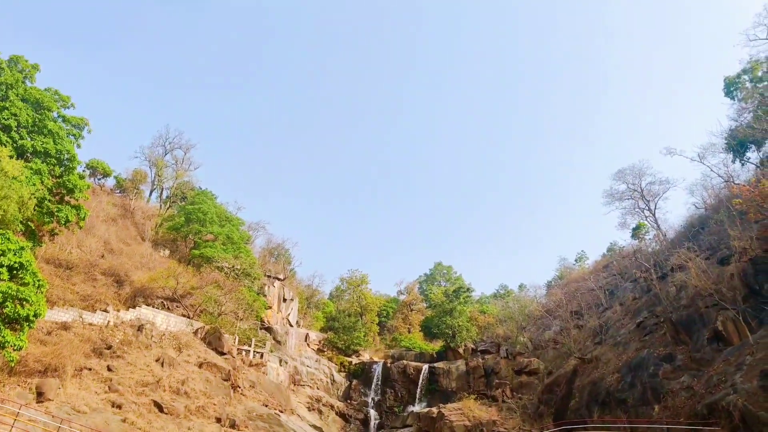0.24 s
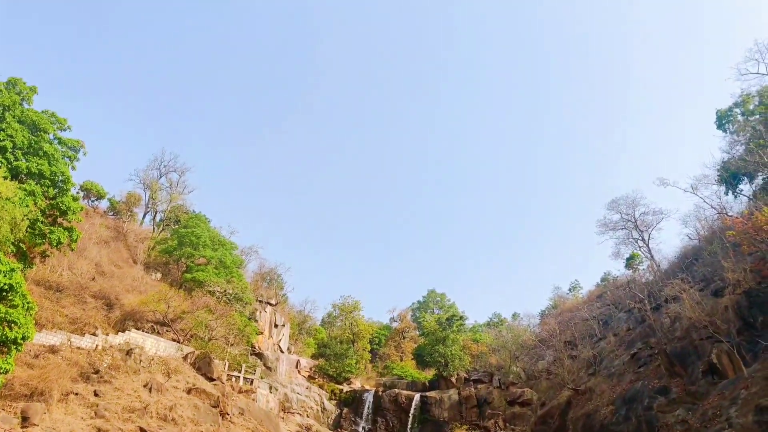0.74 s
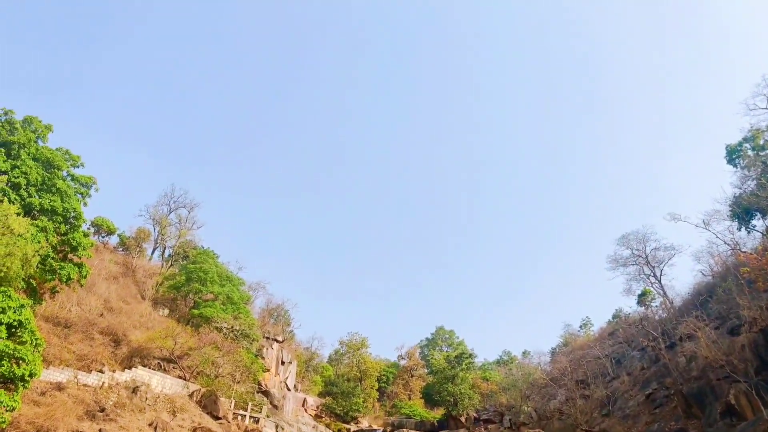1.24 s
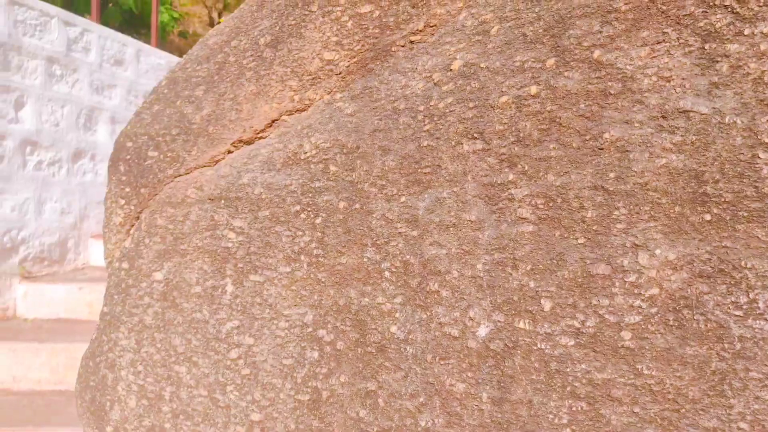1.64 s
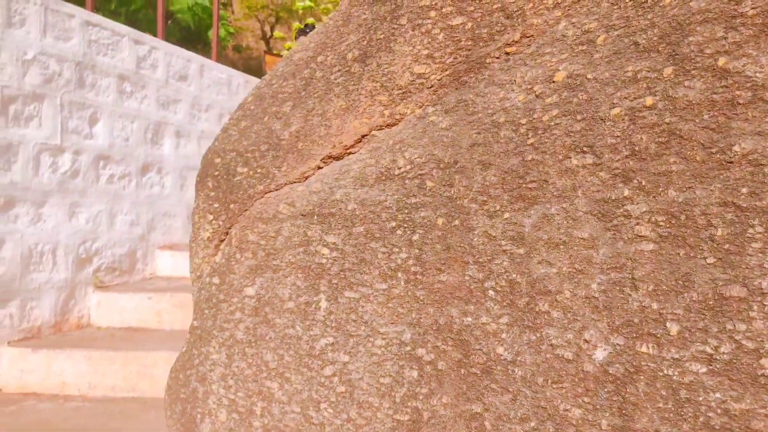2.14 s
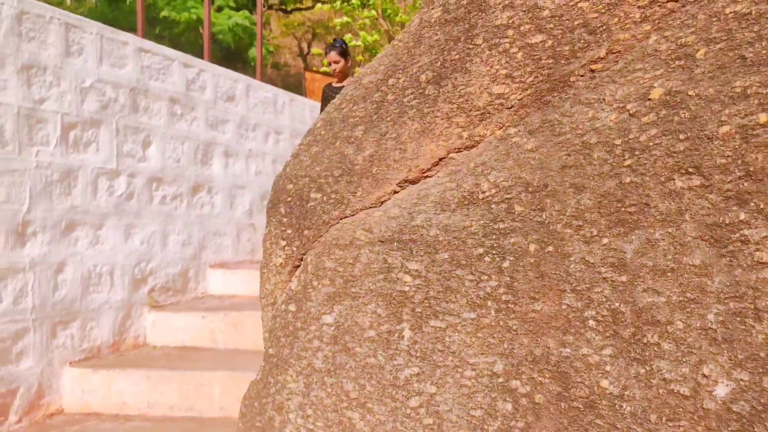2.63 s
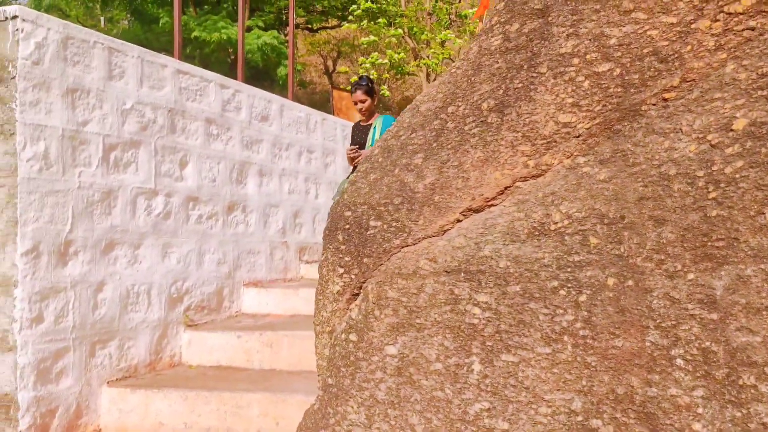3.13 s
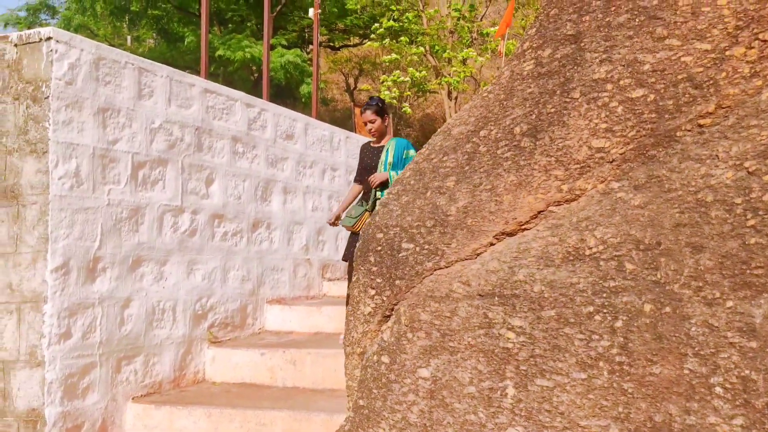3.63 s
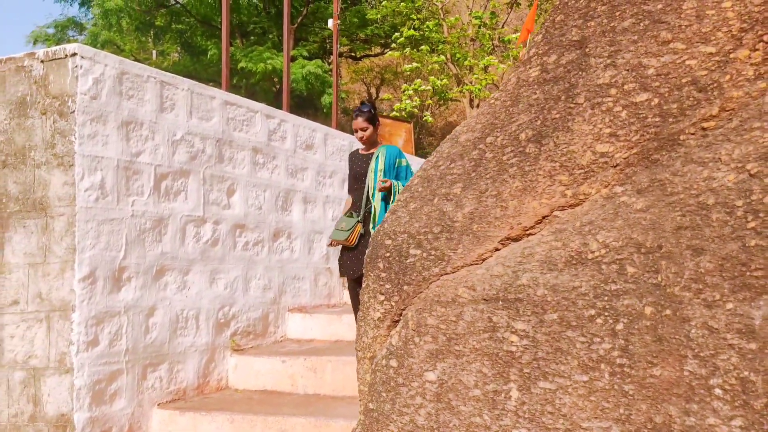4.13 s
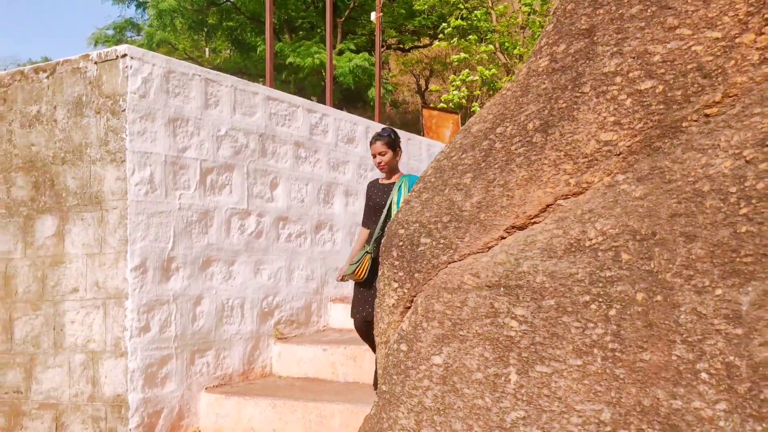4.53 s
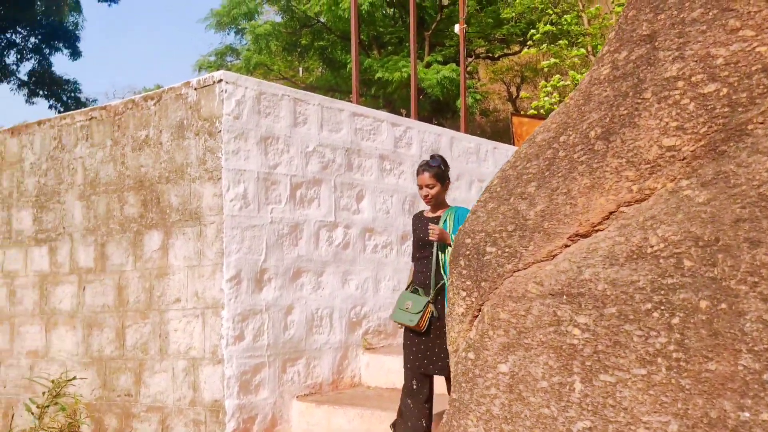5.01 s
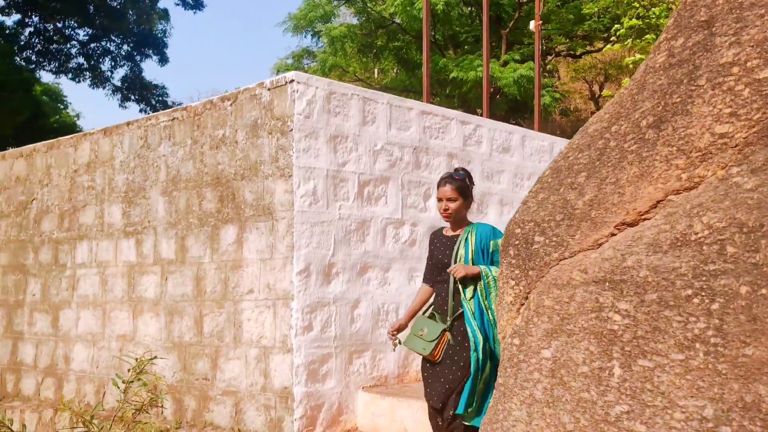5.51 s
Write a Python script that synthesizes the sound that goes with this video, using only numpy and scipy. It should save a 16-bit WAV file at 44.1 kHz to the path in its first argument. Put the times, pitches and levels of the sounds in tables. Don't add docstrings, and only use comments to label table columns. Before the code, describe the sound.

Dense falling water beats on a rock face, full and bright and slightly stronger on the left. A short gap of silence interrupts it; the rush swells back with duller treble, then turns duller still. The handheld stereo pickup has faint hiss and slightly grainy treble. Two soft footfalls on stone barely show, and tiny metallic bells shimmer close to the end.

```python
import sys
import numpy as np
from scipy import signal
from scipy.fft import rfft, irfft
from scipy.io import wavfile
from scipy.ndimage import uniform_filter1d, map_coordinates

SR = 44100
rng = np.random.default_rng(int(sys.argv[2]) if len(sys.argv) > 2 else 0)


def store_wav(level_fs):
    pcm = np.round(np.clip(np.atleast_2d(level_fs), -1, 1) * 32767)
    wavfile.write(sys.argv[1], SR, pcm.T.astype(np.int16))


def nominal_scale(level):
    x = np.asarray(level, float) / 20
    return 10 ** x


N = 254016

# pitch_hz, left_db (per Hz), right_db (per Hz), likeness (0-1)
FACING_COLOUR = [(25, -65, -80, 0.73), (68.6, -56, -58.5, 0.99), (170, -63.5, -67, 1), (299, -63, -66.5, 1),
                 (690, -63.5, -67, 0.94), (810, -68, -72, 0.9), (1330, -69, -72.5, 0.3),
                 (1710, -70, -76, 0.36), (2525, -67, -70.5, 1), (3230, -66.5, -73, 0.2),
                 (5190, -80.5, -73.5, 0), (6000, -84.5, -80, 0.7), (8600, -85.5, -84, 1),
                 (9850, -99, -88.5, 0.8)]
BOULDER_COLOUR = [(25.5, -81, -71, 0.58), (72.4, -60.5, -65, 1), (163, -65, -67, 0.96), (307, -66, -68, 1),
                  (650, -67, -72, 0.49), (920, -71, -73, 0.78), (1290, -71, -73, 0.86),
                  (1660, -73.5, -79.5, 0.19), (2030, -71.5, -74.5, 0.55), (3750, -74, -77.5, 0.39),
                  (5440, -84, -73, 0.89), (6000, -93, -77, 0.28), (8000, -96.5, -82, 0.89),
                  (9250, -101, -88, 0.97)]
TURNED_COLOUR = [(25.9, -72.5, -80, 0.85), (70, -60.5, -63, 0.88), (160, -64.5, -68.5, 1),
                 (306, -67, -69.5, 1), (705, -68.5, -71, 0.94), (890, -69, -72, 0.98),
                 (1310, -72.5, -72, 0.77), (1710, -73, -74, 0.97), (2430, -72.5, -73, 0.59),
                 (3770, -75.5, -77.5, 0.34), (5110, -82.5, -74, 0.4), (6040, -94, -82, 0.61),
                 (7180, -93.5, -85.5, 0.99), (8470, -90, -89, 0.97)]
# start_s, end_s, left_lag_samples
STANCES = [
    (-1, 1.5, -2),
    (1.5, 3.31, 21),
    (3.31, 7, 17.5),
]
# cut_s, restart_s
SILENCE = (1.404, 1.608)
# silent_s, full_s
FADE_IN = (1.588, 1.898)
# pitch_hz, width_hz, left_db, right_db
PORT_CAVITIES = [
    (4233, 190, -5, -7.5),
    (4950, 450, 9, -4),
]
# top_hz, fall_db_per_khz, hiss_10k_db (per Hz), hiss_15k5_db (per Hz)
TREBLE_EDGES = [
    (9300, 16, -97.5, -103.5),
    (9300, 22, -104.5, -105.5),
    (8150, 36, -104.5, -104.5),
]
# centre_s, swell_db, width_s
SURGES = [
    (0.6, 0.5, 0.18),
    (0.85, 1, 0.11),
    (1.3, -0.5, 0.13),
    (2.05, 0.5, 0.21),
    (2.7, -0.5, 0.21),
    (3.65, -0.5, 0.15),
    (3.95, 1.5, 0.22),
    (4.7, 1, 0.36),
]
# start_s, opening_per_s, left_lag_samples (per unit of opening)
VIEW_DRIFT = [
    (0.6, -0.22, -4.5),
    (2.2, -0.16, 5.5),
    (4.7, 1.0, -1.5),
]
# start_s, level_db (peak), pitch_hz
BELL_SHAKES = [
    (3.462, -52, 11300),
    (5.3403, -46, 12600),
    (5.4944, -49, 13200),
    (5.519, -40.5, 11100),
    (5.5834, -48, 10930),
    (5.6426, -44, 11300),
    (5.675, -42, 11200),
    (5.6905, -56, 11300),
]
# centre_s, pitch_hz, level_db, width_s
FOOTFALLS = [
    (2.562, 465, -36, .012),
    (5.189, 175, -30, .012),
]
BLOCK_STARTS = (790, 301)

BLOCK = 1024
JOINT_HZ = 6150
t = np.arange(N) / SR
f = np.maximum(np.arange(N // 2 + 1) * SR / N, 1)


def falls():
    rush_share, spray_share = 0.1, 0.6
    streams = rfft(water())
    swell = sum(db * np.exp(-((t - s) / width) ** 2) for s, db, width in SURGES)
    sides = np.array([[.5], [-.5]])
    colours = (FACING_COLOUR, BOULDER_COLOUR, TURNED_COLOUR)
    out, late = 0, 0
    for colour, (start, end, lag), (since, rate, shift), edge in zip(colours, STANCES, VIEW_DRIFT, TREBLE_EDGES):
        top_hz, fall_db, hiss_low_db, hiss_high_db = edge
        view = rate * np.maximum(t - since, 0)
        view = view - view[(t > start) & (t < end)].mean()
        late = late + shift * view * (t > start) * (t <= end)
        rush_db = rush_share * swell + view * (1.5 - 3 * sides)
        spray_db = spray_share * swell + view * (3.5 + 4 * sides)
        roar, rush, spray = bands(stance(streams, colour, lag, top_hz, fall_db), [400, 2500, 7500])
        heard = roar * nominal_scale(swell) + rush * nominal_scale(rush_db) + spray * nominal_scale(spray_db)
        heard = heard + hiss(hiss_low_db, hiss_high_db)
        blend = np.clip(np.minimum(t - start, end - t) / 0.046 + .5, 0, 1) ** .8
        out = out + heard * blend
    return turn(out, late)


def water(flicker_db=0.93, surge_db=0.04, splash=0.27):
    surge = walk(9)
    drops = np.sqrt(1 - splash + splash * splashes(550, spread_db=6.0, tail_s=0.0059))
    centres_hz = 40 * 2 ** np.arange(0, 9, .7)
    parts = bands(rng.standard_normal((3, N)) * drops, centres_hz)
    return sum(part * nominal_scale(surge_db * surge + flicker_db * walk(14)) for part in parts)


def splashes(rate, spread_db, tail_s):
    strength = nominal_scale(spread_db * np.minimum(rng.exponential(size=N), 3)) ** 2
    hits = (rng.random(N) < rate / SR) * strength
    power = signal.lfilter([1], [1, -np.exp(-1 / (tail_s * SR))], hits)
    return power / power.mean()


def walk(rate):
    hold = int(SR / rate)
    held = np.repeat(rng.standard_normal(N // hold + 1), hold)
    return 1.3 * uniform_filter1d(uniform_filter1d(held, hold), hold)[:N]


def bands(x, centres_hz):
    spectrum = rfft(x)
    for one in np.eye(len(centres_hz)):
        yield irfft(spectrum * np.interp(np.log(f), np.log(centres_hz), one), N)


def stance(streams, colour, lag, top_hz, fall_db):
    hz, left_db, right_db, likeness = np.transpose(colour)
    db = np.array([np.interp(np.log(f), np.log(hz), side) for side in (left_db, right_db)])
    for centre, width, *gain_db in PORT_CAVITIES:
        db = db + np.outer(gain_db, np.exp(-.5 * ((f - centre) / width) ** 2))
    db = db - fall_db * np.maximum(f - top_hz, 0) / 1000
    like = np.clip(np.interp(np.log(f), np.log(hz), likeness), 0, 1)
    delay = np.exp(-2j * np.pi * f * lag / SR * (f < JOINT_HZ))
    shared = streams[0] * np.array([delay, delay ** 0])
    mixed = np.sqrt(like) * shared + np.sqrt(1 - like) * streams[1:]
    return irfft(mixed * nominal_scale(db) * np.sqrt(SR / 2), N)


def turn(x, late):
    below = irfft(rfft(x[0]) * (f < JOINT_HZ), N)
    moved = map_coordinates(below, [np.arange(N) - late], mode="mirror")
    return np.array([x[0] - below + moved, x[1]])


def bells(t60=0.042, spread=0.013):
    out, span = np.zeros(N + SR), np.arange(SR // 8)
    for (s, db, hz), pellets in zip(BELL_SHAKES, rng.random((len(BELL_SHAKES), 4, 2))):
        for late, tune in pellets:
            age = np.maximum(span / SR - 0.017 * late, 0)
            shell_hz = hz * (1 + spread * (2 * tune - 1))
            ring = np.sin(2 * np.pi * shell_hz * age) * 1000 ** (-age / t60)
            out[int(s * SR) + span] += nominal_scale(db - 11.5) * ring
    return out[:N]


def thud():
    return sum(nominal_scale(db) * np.cos(2 * np.pi * hz * (t - s)) * np.exp(-((t - s) / width) ** 2)
               for s, hz, db, width in FOOTFALLS)


def hiss(low_db, high_db, apart=1.05):
    noise = rfft(rng.standard_normal((3, N)))
    db = np.interp(f, [7000, 10000, 15500], [low_db - 6, low_db, high_db])
    return irfft((noise[0] + apart * noise[1:]) * nominal_scale(db) * np.sqrt(SR / 2), N)


def settle():
    start_s, rise_s, damp_s, kick_s = 1.775, .035, .58, .012
    age = np.maximum(t - start_s, 0)
    swing = np.sin(2 * np.pi * (age + .275) / 1.7)
    swing = (1 - np.exp(-age / rise_s)) * np.exp(-age / damp_s) * swing
    kick = np.exp(-((t - start_s + kick_s / 2) / kick_s) ** 2)
    return .064 * swing - .014 * kick


def thin_treble(x, grid, step_db, patchy_db, step_jitter_db=1.5, rich_db=-7, dead=.1):
    n, k = np.arange(2 * BLOCK), np.arange(288, 736)
    window = np.sqrt(2 / BLOCK) * np.sin(np.pi * (n + .5) / (2 * BLOCK))
    basis = window * np.cos(np.pi / BLOCK * np.outer(k + .5, n + .5 + BLOCK / 2))
    lead = 2 * BLOCK - grid
    padded = np.pad([x[0] + x[1], x[0] - x[1]], ((0, 0), (lead, 3 * BLOCK))) / 2
    places = np.arange(N // BLOCK + 3)[:, None] * BLOCK + n
    lines = (padded[:, places] @ basis.T).reshape(2, len(places), -1, 32)
    gain, jitter = rng.standard_normal((2, *lines.shape[:3], 1))
    power = uniform_filter1d(np.mean(padded[0, places] ** 2, axis=1), size=15)
    loudness = np.sqrt(power)[:, None, None] + 1e-9
    step = loudness * nominal_scale(step_db + step_jitter_db * jitter)
    patchy = lines * nominal_scale(patchy_db * gain)
    rich = np.sqrt(np.mean(patchy ** 2, axis=3, keepdims=True)) > .6 * step
    step = np.where(rich, nominal_scale(rich_db), 1) * step
    rounded = np.sign(patchy) * np.floor(abs(patchy) / step + .5 - dead) * step
    changes = (rounded - lines).reshape(2, len(places), -1) @ basis
    for row, blocks in zip(padded, changes):
        row += np.bincount(places.ravel(), blocks.ravel(), len(row))
    mid, side = padded[:, lead:lead + N]
    return np.array([mid + side, mid - side])


def scene():
    return falls() + bells() + thud()


def roll_off(x):
    return signal.sosfilt(signal.butter(12, 15720, fs=SR, output="sos"), x)


def record(dry):
    cut, restart = SILENCE
    silent, full = FADE_IN
    fade_in = (t >= restart) * np.clip((t - silent) / (full - silent), 0, 1)
    fade = np.where(t < cut, 1, fade_in)
    swing = settle()
    drift = nominal_scale(-55) * np.array([walk(9), walk(9)]) * fade ** 2
    first = thin_treble(dry, BLOCK_STARTS[0], step_db=-14, patchy_db=2.3)
    again = thin_treble(first, BLOCK_STARTS[1], step_db=-15, patchy_db=1.6, step_jitter_db=2.2)
    mix = fade * again + drift + np.array([swing, 0.043 * swing])
    return roll_off(mix)


dry = scene()
out = record(dry)
store_wav(out)
```